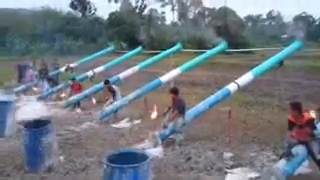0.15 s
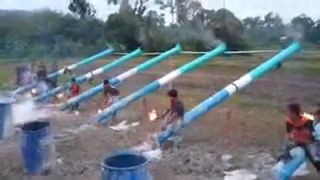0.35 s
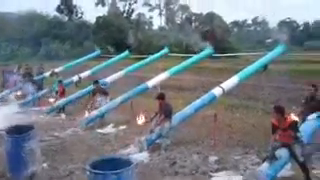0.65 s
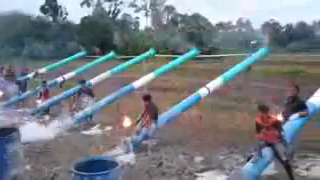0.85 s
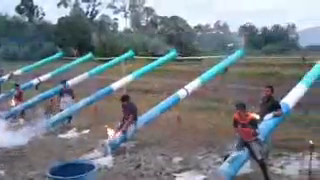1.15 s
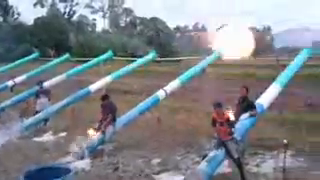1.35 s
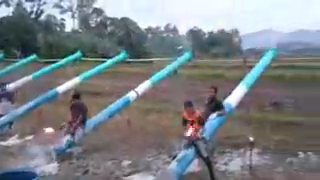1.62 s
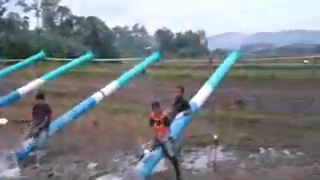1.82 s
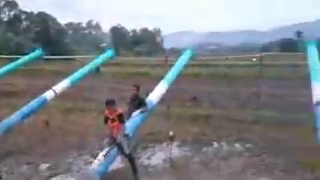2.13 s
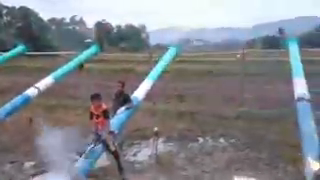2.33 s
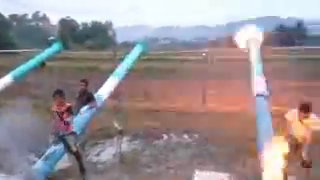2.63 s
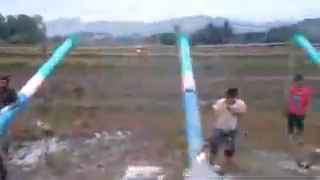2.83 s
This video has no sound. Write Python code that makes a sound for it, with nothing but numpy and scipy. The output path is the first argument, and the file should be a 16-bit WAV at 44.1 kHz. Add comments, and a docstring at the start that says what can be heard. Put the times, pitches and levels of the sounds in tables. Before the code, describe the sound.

Large tube cannons fire five loud shots in an open field, each a brief hiss, crack, roar and deep boom; trees return rumbling echoes, claps and thuds, caught by one small limiting microphone in mono.

```python
"""Across an open field in front of a tree line, a row of long tube cannons is fired one after another.
Each shot hisses from the touch hole, cracks and roars from the muzzle and ends in a deep boom and a ring.
From a quarter second on the tree line rolls the shot back as a rumble; single claps and thuds return too.
Noise bands make hiss, roar, ring and rumble; shock pulses the cracks and claps; short tones the booms and thuds.
One small microphone hears it in mono, and the recorder's limiter turns down around loud blasts."""
import sys
import numpy as np
from scipy import signal
from scipy.io import wavfile
from scipy.ndimage import uniform_filter1d, minimum_filter1d

SR = 44100
rng = np.random.default_rng(int(sys.argv[2]) if len(sys.argv) > 2 else 0)


def unload_audio(sound):
    """Save the sound as a 16-bit wav file, at the path given as the first command line argument."""
    columns = np.transpose(np.atleast_2d(sound))
    # keep every value between -1 and 1, then stretch to whole-number steps
    steps = np.round(np.clip(columns, -1, 1) * 32767)
    wavfile.write(sys.argv[1], SR, steps.astype(np.int16))


N = 131418
T = np.arange(N) / SR
BANDS_HZ = 31.25 * 2 ** (np.arange(25) / 3)

# All levels are relative, ahead of the microphone and limiter; spectrum levels are per octave.
# Tree line rumble [f/Hz, level/dB, rise/s, t60/s]
TREE_LINE_SPECTRUM = [(30, -58, .15, 4), (50, -23, .17, 5), (112, -14.5, .17, 8), (175, -25.5, .08, 4),
                      (250, -40, .04, 4), (450, -35, .03, 12), (750, -33.3, .06, 24),
                      (1450, -37.8, .02, 13), (2300, -33.8, .018, 10), (3600, -37.3, .018, 5),
                      (6500, -38, .022, 3.3), (8500, -44, .025, 2.3)]
# Deep echoes from the far side of the field [t/s, level/dB, f/Hz]
FAR_THUDS = [(.16, -7, 72), (.468, -9, 76), (.513, -6, 80), (.602, -13, 115), (.685, -12, 112),
             (.775, -12, 104), (1.15, -6, 95), (1.435, -6, 84), (1.49, -12, 85), (1.504, -13, 240),
             (2.041, -3.5, 84), (2.075, -12, 105), (2.178, -10, 100), (2.272, -13, 85), (2.32, -10, 85),
             (2.646, -8, 80)]
# Sharp echoes from single trees and banks [t/s, level/dB before filtering]
TREE_CLAPS = [(.003, -11), (.327, -15), (.459, -8.5), (.489, -12), (.562, -9), (.588, -11), (.633, -8),
              (.658, -10), (.731, -10.5), (.784, -10), (1.234, -15), (1.376, -8.5), (1.481, -10),
              (1.503, -11), (1.983, -10), (2.015, -12), (2.088, -11), (2.159, -8), (2.176, -13),
              (2.188, -11), (2.259, -12), (2.312, -12), (2.778, -10)]
# Tubes and nearby ground ringing on [f/Hz, level/dB]
RING_SPECTRUM = [(30, -42), (55, -15), (110, -11.5), (185, -14), (270, -19), (420, -34), (900, -39.5),
                 (2200, -34.5), (6500, -34), (8500, -37.5)]
# Gas jet at the touch hole [f/Hz, level/dB]
HISS_SPECTRUM = [(30, -40), (300, -7), (1200, -9), (3500, -7), (6000, -1), (8000, 1)]
# Muzzle roar [f/Hz, level/dB, rise/s, t60/s]
ROAR_SPECTRUM = [(30, -40, .02, .6), (60, -12, .02, .6), (120, -6, .035, .6), (220, -.3, .06, .62),
                 (420, -4.5, .028, .43), (850, -7, .007, .27), (1500, -10, .012, .26),
                 (2400, -10.5, .012, .28), (4200, -13.5, .011, .33), (6500, -12.8, .018, .36),
                 (8500, -15.5, .018, .35)]
# Shots, the first one before the start [t/s, roar level/dB, roar hold/s, hiss level/dB, hiss length/s,
# boom delay/s, boom level/dB, boom f/Hz, ring and echo level/dB]
CANNON_SHOTS = [(-.62, -3, .04, -20, .03, .06, 0, 118, -1),
                (.0505, -7, .038, -25, .032, .064, -.3, 112, .2),
                (.956, -6.3, .046, -22.5, .04, .07, -1.5, 124, .1),
                (1.552, -6, .04, -23, .024, .068, .3, 112, .6),
                (2.397, -6, .068, -14, .028, .087, -1, 118, 3.3),
                (2.821, -6.3, .052, -25, .036, .086, -2, 124, -1)]
# Shock fronts from the muzzles, and one from a flashing breech [t/s, level/dB before filtering, length/s]
SHOCK_FRONTS = [(.0505, -1, .0008), (.956, 1, .0015), (1.552, 0, .002), (2.3718, 5.5, .002),
                (2.3755, 3, .0016), (2.406, 5, .0018), (2.821, 0, .0014)]

AIR_DB = -62  # steady hush, per octave
ECHO_DELAY_S, ECHO_LASTS_S, ECHO_FADE_S = .262, .61, .13
ECHO_GRAIN_DB, ECHO_GRAIN_HZ = 1.7, 130
THUD_WIDTH_S = .011
CLAP_S, CLAP_LOW_HZ, CLAP_HIGH_HZ = .0012, 400, 1800
CLAP_SCATTER_DB, CLAP_T60_S = -5.5, .05
RING_RISE_S, RING_T60_S, RING_END_S, RING_FADE_S = .08, 1.3, .24, .06
HISS_RISE_S, HISS_T60_S, HISS_GAP_S = .026, .035, .01  # the hiss drops away this long before the blast
BOOM_WIDTH_S, BOOM_SAG_PER_S = .028, 3.5  # pitch sinks by this share of its table value each second
ROAR_GRAIN_DB, ROAR_GRAIN_HZ = 1.8, 350
GROUND_LAG_S, GROUND_DB, CRACK_TOP_HZ = .0046, -7, 2400
MIC_LOW_HZ, MIC_TOP_HZ, CUTOFF_HZ = 41, 8500, 8600
LIMIT_DB, SENSE_S, LOOK_AHEAD_S, GAIN_SLEW_S = -10.2, .012, .006, .006
HOLD_S, RELEASE_DB_PER_S = .13, 72
CEILING = .8  # full scale = 1


def from_db(db):
    """Decibels to gain."""
    return 10 ** (np.asarray(db) / 20)


def rms_one(x):
    """Scale to unit power."""
    return x / np.sqrt(np.mean(x ** 2) + 1e-20)


def at_hz(table, hz):
    """Read every column of a spectrum table at one frequency, on a log frequency axis."""
    freqs, *columns = np.transpose(table)
    return [np.interp(np.log(hz), np.log(freqs), c) for c in columns]


def grain(depth_db, top_hz):
    """A randomly fluttering gain of unit power, its flutter low-passed at top_hz."""
    sos = signal.butter(2, top_hz, fs=SR, output="sos")
    flutter = signal.sosfilt(sos, rng.standard_normal(N + SR))[SR:]
    return rms_one(from_db(depth_db * rms_one(flutter)))


def noise_bands():
    """Third-octave noise bands as (Hz, signal), each with unit power per octave."""
    white = rng.standard_normal((2, N + SR // 2))  # neighbouring bands draw on different noise
    edge = 2 ** (1 / 6)
    for k, hz in enumerate(BANDS_HZ):
        sos = signal.butter(2, [hz / edge, hz * edge], "band", fs=SR, output="sos")
        band = signal.sosfilt(sos, white[k % 2])[SR // 2:]
        yield hz, rms_one(band) / np.sqrt(3)


def shaped_noise(spectrum):
    """Steady noise with the levels of a spectrum table."""
    return sum(from_db(at_hz(spectrum, hz)[0]) * band for hz, band in noise_bands())


def swell(age, rise, hold, t60):
    """Linear rise from age zero, exponential decay once age passes hold."""
    decay = np.exp(-np.log(1000) * np.maximum(age - hold, 0) / t60)
    return np.clip(age / max(rise, 1e-4), 0, 1) * decay


def fade(age, end, length):
    """Full level until the end, then a smooth fall."""
    return np.exp(-(np.maximum(age - end, 0) / length) ** 2)


def all_shots(envelope):
    """Power sum of envelope(age, shot row) over the shots."""
    t = T[::16]
    power = sum(envelope(t - shot[0], shot) ** 2 for shot in CANNON_SHOTS)
    return np.interp(T, t, np.sqrt(power))


def n_wave(start, length):
    """A shock: pressure jumps up, falls through zero and jumps back."""
    u = (T - start) / length
    return (1 - 2 * u) * ((u >= 0) & (u < 1))


def tree_line_echo_and_air():
    """Countless reflections roll back from the trees, the treble dying soonest, over a faint steady hush."""
    out = 0
    for hz, band in noise_bands():
        db, rise, t60 = at_hz(TREE_LINE_SPECTRUM, hz)

        def rumble(age, shot):
            age = age - ECHO_DELAY_S
            return from_db(shot[-1]) * swell(age, rise, rise, t60) * fade(age, ECHO_LASTS_S, ECHO_FADE_S)
        out = out + band * (from_db(db) * all_shots(rumble) + from_db(AIR_DB))
    return out * grain(ECHO_GRAIN_DB, ECHO_GRAIN_HZ)


def thuds():
    """Far reflections of which only a few cycles at most of low tone are left."""
    out = 0
    for s, db, hz in FAR_THUDS:
        age = T - s
        out = out + from_db(db) * np.exp(-(age / THUD_WIDTH_S) ** 2) * np.cos(2 * np.pi * hz * age)
    return out


def claps():
    """Single reflections: a thinned shock with a short spray of scatter."""
    scatter = from_db(CLAP_SCATTER_DB) * rng.standard_normal(N)
    spray = sum(from_db(db) * swell(T - s, CLAP_S, CLAP_S, CLAP_T60_S) for s, db in TREE_CLAPS)
    shocks = sum(from_db(db) * n_wave(s, CLAP_S) for s, db in TREE_CLAPS)
    sos = signal.butter(2, [CLAP_LOW_HZ, CLAP_HIGH_HZ], "band", fs=SR, output="sos")
    return signal.sosfilt(sos, shocks + spray * scatter)


def ring():
    """Hollow drone of the tubes and scatter from the nearby ground after each blast."""
    def drone(age, shot):
        level = from_db(shot[-1]) * swell(age, RING_RISE_S, RING_RISE_S, RING_T60_S)
        return level * fade(age, RING_END_S, RING_FADE_S)
    return all_shots(drone) * shaped_noise(RING_SPECTRUM)


def touch_hole_hiss():
    """Burning gas jets from the touch hole ahead of the blast, the hiss dropping away just before it."""
    def spurt(age, shot):
        level_db, length = shot[3:5]
        return from_db(level_db) * swell(age + length, HISS_RISE_S, length - HISS_GAP_S, HISS_T60_S)
    return all_shots(spurt) * shaped_noise(HISS_SPECTRUM)


def booms():
    """The gas column swings for a few cycles, sinking in pitch as it cools."""
    out = 0
    for s, *_, delay, db, hz, _ in CANNON_SHOTS:
        age = T - s - delay  # zero at the boom's peak
        swing = np.cos(2 * np.pi * hz * (age - BOOM_SAG_PER_S * age ** 2 / 2))
        out = out + from_db(db) * np.exp(-(age / BOOM_WIDTH_S) ** 2) * swing
    return out


def roar():
    """Ragged outrush of gas: the treble comes first, the bass builds later and lasts longer."""
    out = 0
    for hz, band in noise_bands():
        db, rise, t60 = at_hz(ROAR_SPECTRUM, hz)

        def outrush(age, shot):
            return from_db(shot[1]) * swell(age, rise, shot[2], t60)
        out = out + from_db(db) * band * all_shots(outrush)
    return out * grain(ROAR_GRAIN_DB, ROAR_GRAIN_HZ)


def cracks():
    """Each shock front and its weaker, later bounce off the ground, with the top softened."""
    direct = sum(from_db(db) * n_wave(s, length) for s, db, length in SHOCK_FRONTS)
    bounce = from_db(GROUND_DB) * np.interp(T - GROUND_LAG_S, T, direct)
    return signal.lfilter(*signal.butter(1, CRACK_TOP_HZ, fs=SR), direct + bounce)


def scene():
    """The field's answer and the cannons, in mono."""
    field = tree_line_echo_and_air() + thuds() + claps()
    cannons = ring() + touch_hole_hiss() + booms() + roar() + cracks()
    return (field + cannons)[None]


def limiter(x):
    """Turns down just ahead of a blast, holds, then recovers at a steady rate."""
    power = np.abs(uniform_filter1d(x ** 2, max(int(SENSE_S * SR), 1)))
    level_db = 10 * np.log10(power + 1e-12)
    half = int(HOLD_S * SR / 2)
    over_db = np.minimum(LIMIT_DB - level_db, 0)
    # the origin shift makes the window look back, so each cut is held
    cut_db = -minimum_filter1d(over_db, 2 * half + 1, origin=half, mode="nearest")
    released_db = RELEASE_DB_PER_S * T
    cut_db = np.maximum.accumulate(cut_db + released_db) - released_db
    ahead_db = np.interp(T + LOOK_AHEAD_S, T, cut_db)
    return x * from_db(-uniform_filter1d(ahead_db, max(int(GAIN_SLEW_S * SR), 1)))


def record(dry):
    """A small microphone's band, limiter, rounded peaks and a steep top cut."""
    heard = signal.sosfilt(signal.butter(2, MIC_LOW_HZ, "high", fs=SR, output="sos"), dry[0])
    heard = signal.sosfilt(signal.butter(6, MIC_TOP_HZ, fs=SR, output="sos"), heard)
    rounded = CEILING * np.tanh(limiter(heard) / CEILING)
    top_cut = signal.ellip(10, .3, 70, CUTOFF_HZ, fs=SR, output="sos")
    return signal.sosfilt(top_cut, rounded)[None]


dry = scene()
out = record(dry)
unload_audio(out)
```